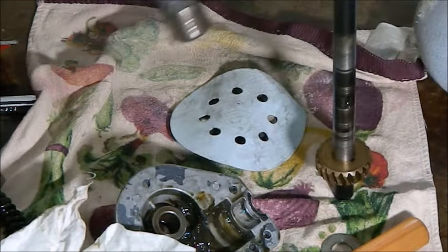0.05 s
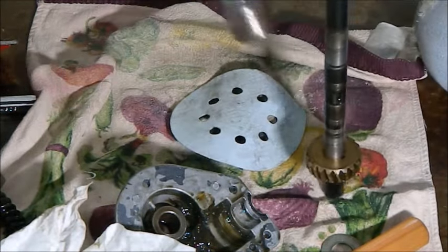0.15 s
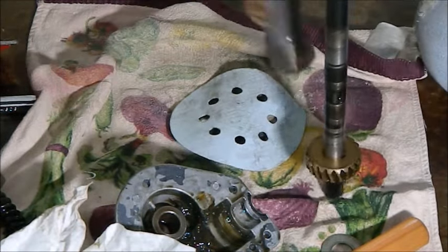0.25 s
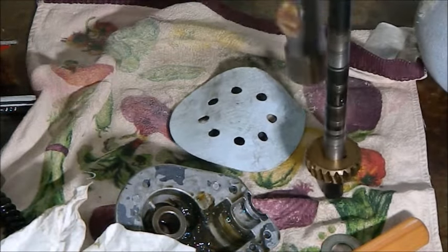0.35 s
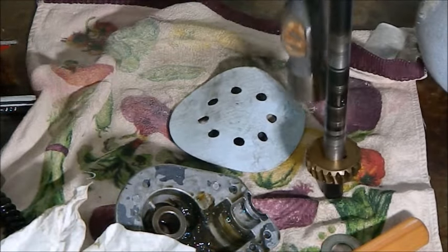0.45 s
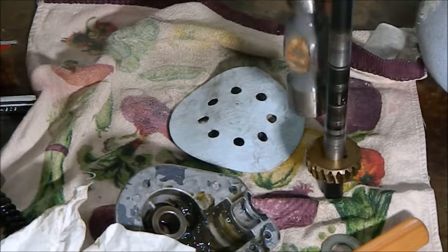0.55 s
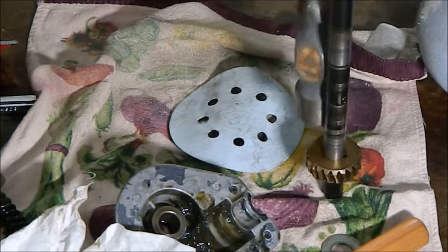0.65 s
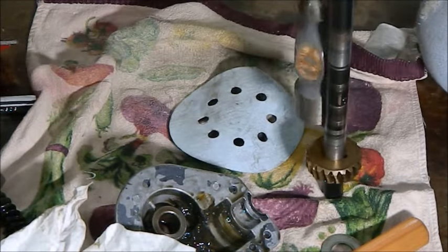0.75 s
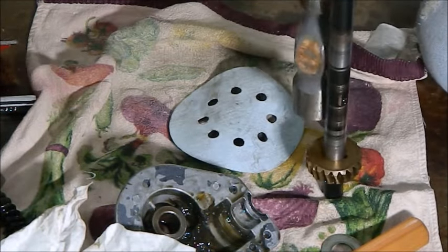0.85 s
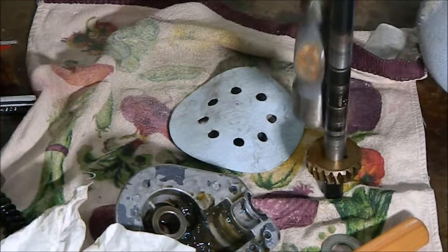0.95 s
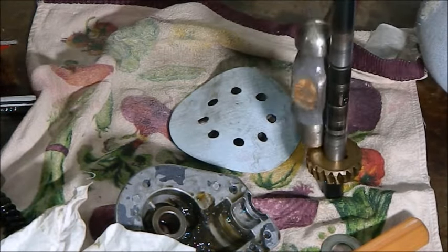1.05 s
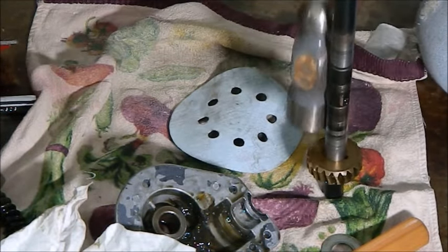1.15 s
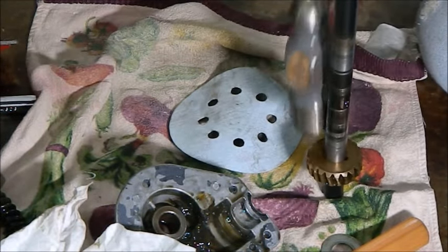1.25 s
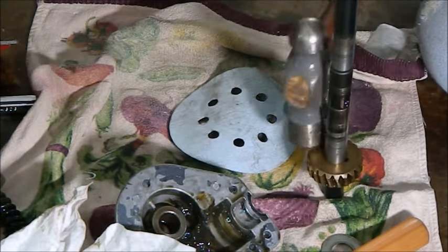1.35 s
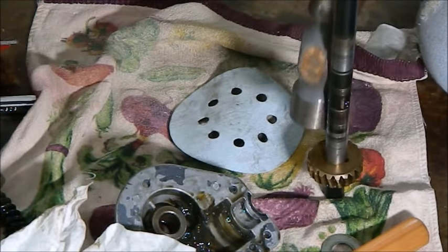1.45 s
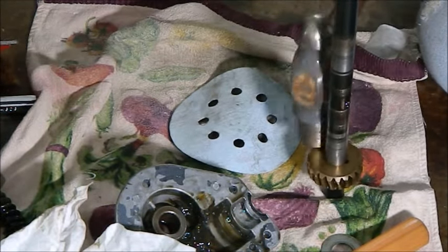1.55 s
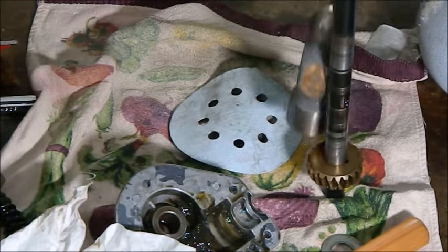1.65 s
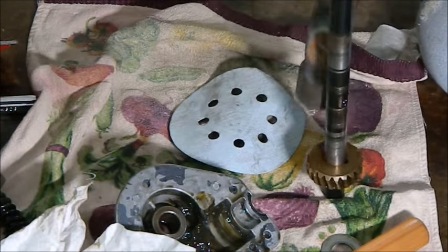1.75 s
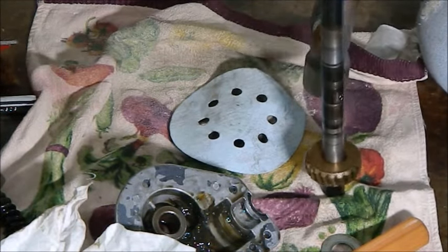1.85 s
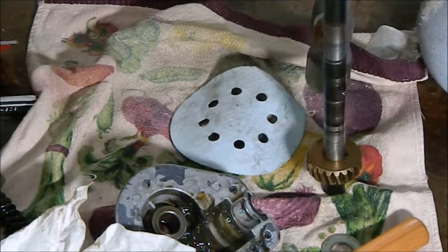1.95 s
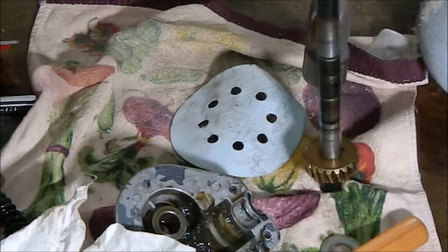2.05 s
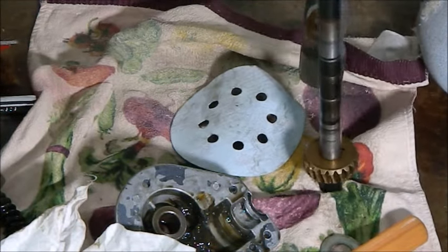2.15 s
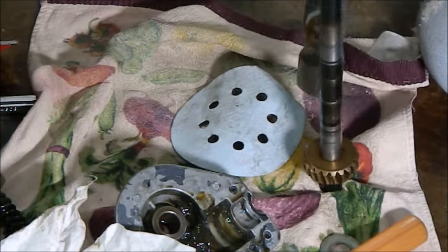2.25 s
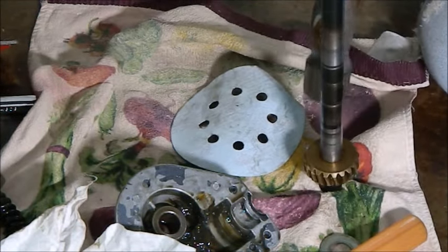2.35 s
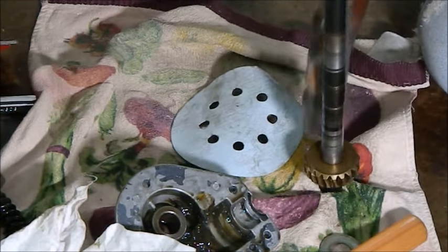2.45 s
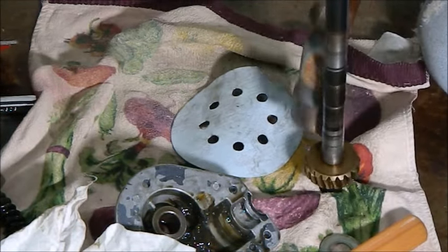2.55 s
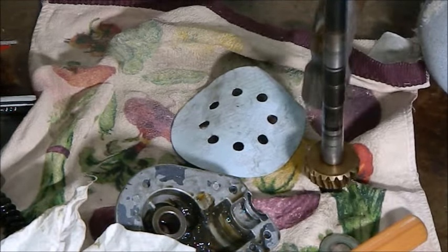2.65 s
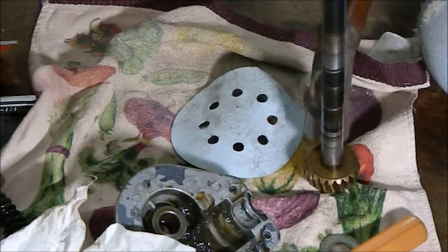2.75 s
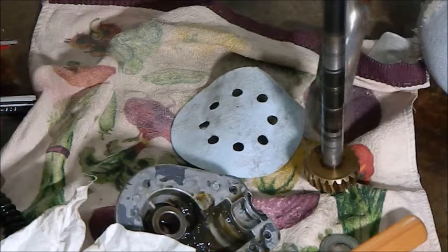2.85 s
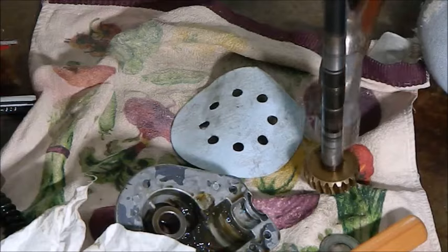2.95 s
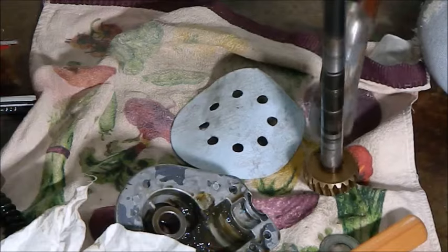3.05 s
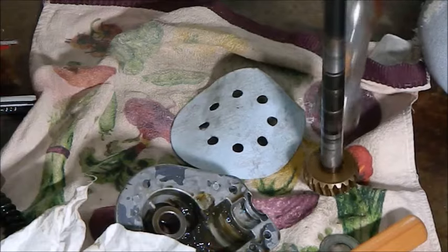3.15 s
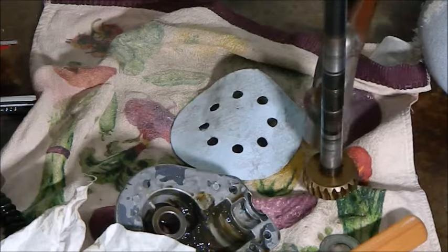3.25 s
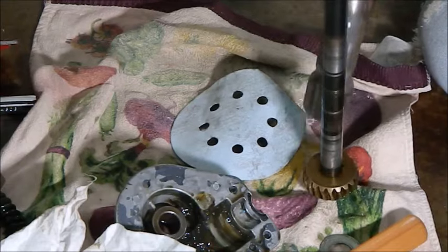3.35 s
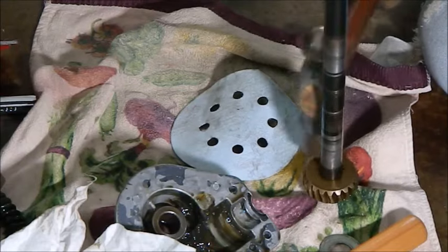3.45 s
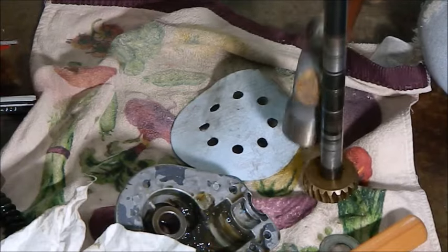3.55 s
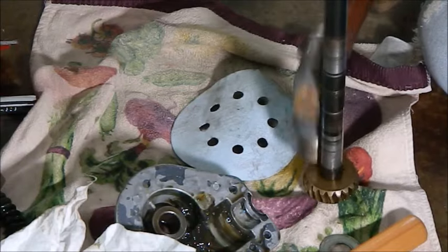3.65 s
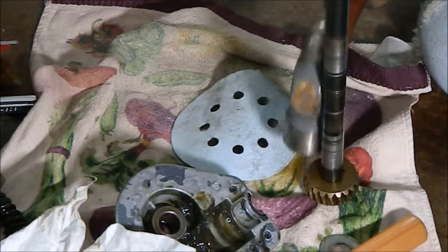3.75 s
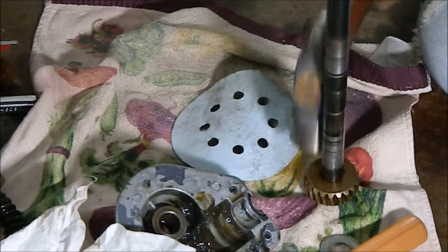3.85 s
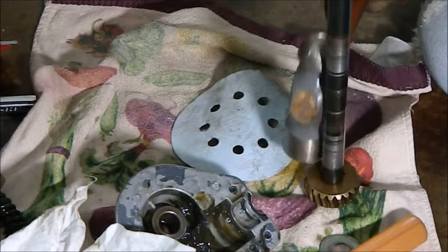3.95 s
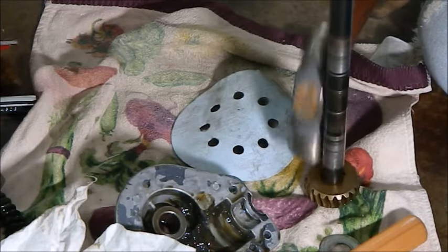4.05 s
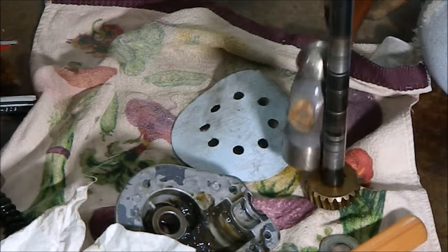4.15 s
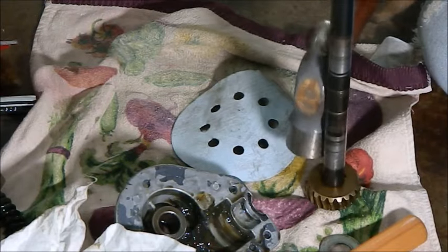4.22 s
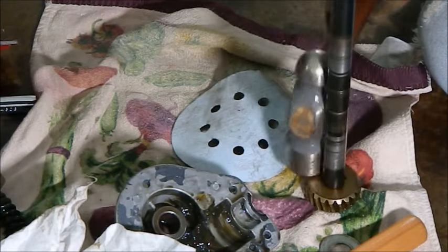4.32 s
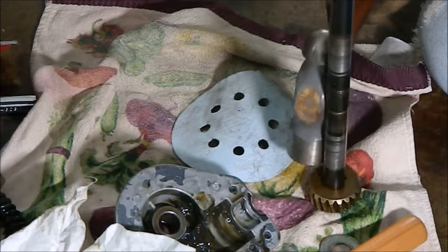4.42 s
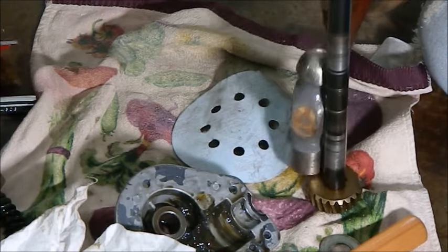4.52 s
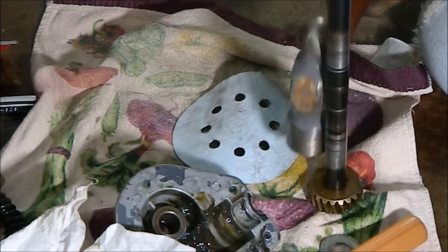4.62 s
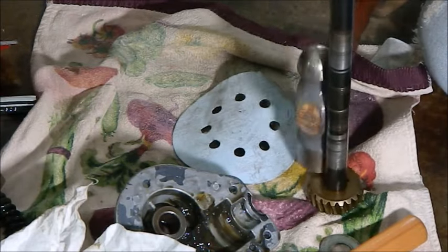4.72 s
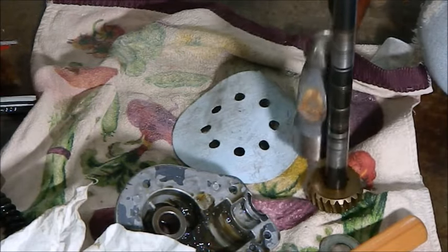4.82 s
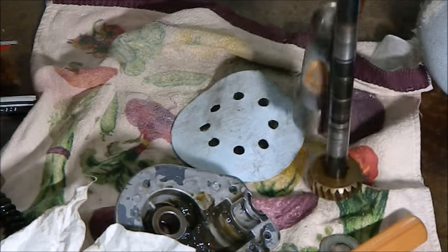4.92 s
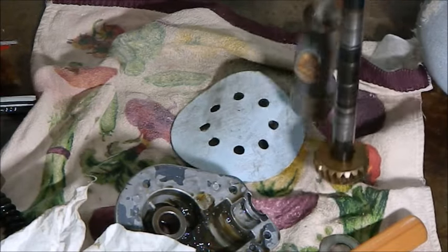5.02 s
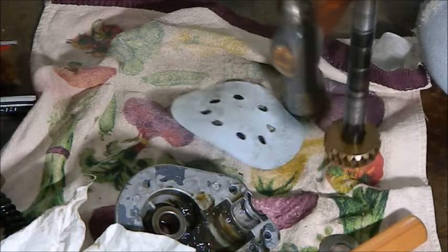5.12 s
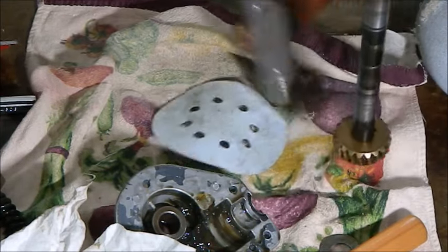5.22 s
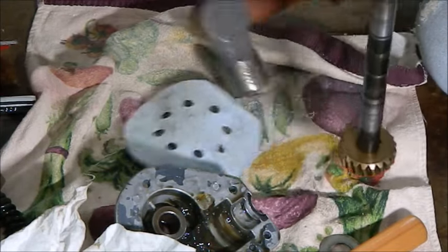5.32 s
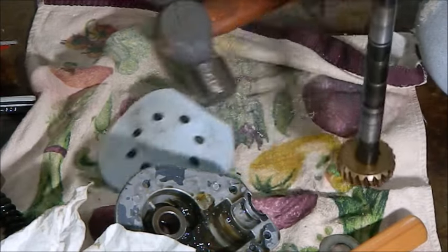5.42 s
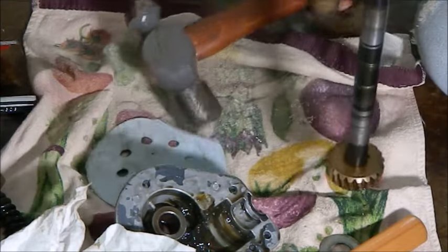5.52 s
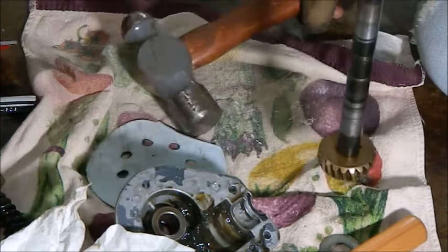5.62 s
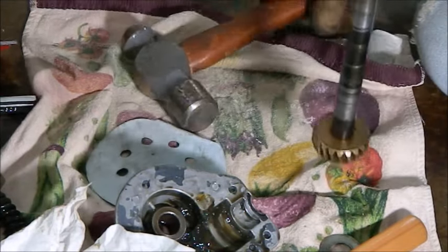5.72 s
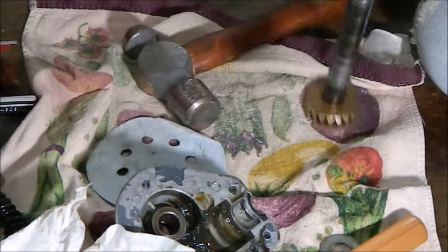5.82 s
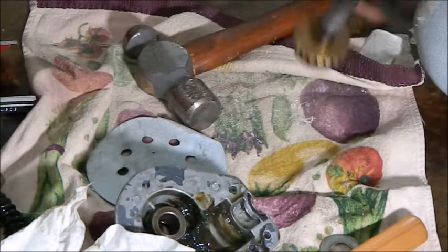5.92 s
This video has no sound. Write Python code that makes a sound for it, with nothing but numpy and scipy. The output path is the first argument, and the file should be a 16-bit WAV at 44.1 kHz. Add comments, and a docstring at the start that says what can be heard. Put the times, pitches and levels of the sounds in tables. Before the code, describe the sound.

Close stereo capture at a cloth-covered workbench indoors: bright, cracking hammer hits on a steel shaft, each with a short ring, gear rattle and woody low knock. Lighter ticks fall between them. The pitch sinks slightly as blows continue. The hammering stops, something brushes across cloth, two dull thuds follow, then one clear steel clank with a faint bounce.

```python
"""A small room with a cloth-covered workbench: a hammer drives a brass gear along a hand-held steel shaft.
Light taps tick and ring the shaft's modes; full blows add a noisy crack, gear rattle and low modes.
Then a cover slides over the cloth as shaped noise, and the work is set down with two padded thuds.
Loose steel clanks last. Dense reflections and a quiet wavering hush surround it all."""
import sys
import numpy as np
from scipy import signal
from scipy.fft import rfft, irfft
from scipy.io import wavfile

SR = 44100
rng = np.random.default_rng(int(sys.argv[2]) if len(sys.argv) > 2 else 0)


def store_wav(level_fs):
    """Save 16-bit WAV to argv[1]."""
    pcm = np.round(np.clip(np.atleast_2d(level_fs), -1, 1) * 32767)
    wavfile.write(sys.argv[1], SR, pcm.T.astype(np.int16))


N = 263629
SOUND_TIME_S = np.arange(int(SR * 0.8)) / SR  # shared by strikes and room tail


def undb(db):
    """Decibels to amplitude gain."""
    return 10 ** (np.asarray(db) / 20)


def along(points, hz):
    """Interpolate a spectrum table on a log-frequency axis."""
    point_hz, value = np.transpose(points)
    return np.interp(np.log(np.maximum(hz, 1)), np.log(point_hz), value)


def colour(x, points, power=1):
    """Filter causally with the table's spectrum: the folded cepstrum gives minimum phase."""
    size = 4096
    level_db = power * along(points, np.fft.rfftfreq(size, 1 / SR))
    cepstrum = irfft(np.log(undb(level_db)))
    cepstrum[1:size // 2] *= 2
    cepstrum[size // 2 + 1:] = 0
    impulse_response = irfft(np.exp(rfft(cepstrum)))
    return signal.fftconvolve(x, impulse_response)[:len(x)]


def unit(x):
    """Scale to an energy of one."""
    return x / np.sqrt(np.sum(x ** 2))


def fade(t60_s):
    """Exponential decay, 60 dB down after t60_s."""
    return np.exp(-np.log(1000) * SOUND_TIME_S / t60_s)


def add(track, start_s, sound):
    """Mix a sound into the track at start_s."""
    i = int(start_s * SR)
    track[..., i:i + sound.shape[-1]] += sound[..., :N - i]


def ring(modes, scatter_db, detune):
    """Sum decaying modes of alternating sign; each strike scatters their levels and pitches."""
    chance = rng.standard_normal((len(modes), 2))
    total = 0
    for k, ((pitch_hz, level_db, t60_s), (level_dev, pitch_dev)) in enumerate(zip(modes, chance)):
        gain = (-1) ** k * undb(level_db + scatter_db * level_dev)
        wave = np.sin(2 * np.pi * pitch_hz * (1 + detune * pitch_dev) * SOUND_TIME_S)
        total = total + gain * fade(t60_s) * wave
    return unit(total)


def contact(spectrum, t60_s, chatter):
    """One sharp impact, then the faces chatter unevenly as decaying noise."""
    grain, size = rng.standard_normal((2, len(SOUND_TIME_S)))
    force = chatter * unit(grain * undb(4 * size) * fade(t60_s))
    force[0] += 1
    return unit(colour(force, spectrum))


# width of diffuse sound: freq_hz, side_minus_mid_db [Hz, dB]
DIFFUSE_WIDTH = [(50, -6), (150, -7), (500, -9.5), (1200, -6.5), (3000, -4.5), (9000, 0.5)]


def spread(mid, side):
    """Left and right of a diffuse field: alike in the bass, apart in the treble."""
    side = colour(side, DIFFUSE_WIDTH)
    return np.array([mid + side, mid - side])


# room air spectrum: freq_hz, level_db_per_hz [Hz, dB per Hz]
HUSH_SPECTRUM = [(15, -87), (25, -39), (64, -5), (161, -5), (326, -16.5), (373, -1), (463, -7.5), (607, -5),
                 (714, -13), (1160, -15), (1480, -16), (2410, -17.5), (2840, -22.5), (16000, -32)]
HUSH_DB, HUSH_WAVER_DB = -59, 0.81


def hush():
    """Quiet room air: coloured stereo noise whose level wavers a little."""
    mid, side = (colour(rng.standard_normal(N), HUSH_SPECTRUM) for _ in range(2))
    air = spread(mid, side)
    waver = np.interp(np.arange(N), np.linspace(0, N, 40), rng.standard_normal(size=40))
    return air / np.std(air) * undb(HUSH_DB + HUSH_WAVER_DB * waver)


# room decay: freq_hz, t60_s [Hz, s]
ROOM_DECAY = [(100, 0.34), (400, 0.47), (2000, 0.37), (5000, 0.38), (8000, 0.31), (15000, 0.18)]
BUILD_UP_S = 0.0046


def reverberation():
    """Dense reflections build up fast and decay band by band, soonest in the top treble."""
    hz = np.fft.rfftfreq(len(SOUND_TIME_S), 1 / SR)
    noise = rfft(rng.standard_normal(len(SOUND_TIME_S)))
    tail = 0
    for centre_hz, t60_s in ROOM_DECAY:
        # triangular band on the log-frequency axis
        band = along([(f, float(f == centre_hz)) for f, _ in ROOM_DECAY], hz)
        tail = tail + irfft(noise * band, len(SOUND_TIME_S)) * fade(t60_s)
    return unit(tail * (1 - np.exp(-SOUND_TIME_S / BUILD_UP_S)))


def room(x, wet_db):
    """Direct sound plus the answer of the walls, by convolution."""
    response = undb(wet_db) * spread(reverberation(), reverberation())
    response[:, 0] += 1
    return signal.fftconvolve(np.atleast_2d(x), response, axes=1)[:, :N]


# rubs of hands, and the stronger sliding cover: peak_s, level_db, width_s [s, dB, s]
RUBS = [(0.126, -67, 0.04), (1.946, -67, 0.1), (2.352, -66.5, 0.027), (5.202, -48.5, 0.063),
        (5.374, -51, 0.058)]
# cloth friction spectrum: freq_hz, level_db_per_hz [Hz, dB per Hz]
CLOTH_SPECTRUM = [(200, -16), (700, -1), (1500, 3), (2600, 9), (4500, 1.5), (8000, -3), (14000, -9),
                  (16000, -23)]
RUB_RISE = 0.41  # share of the width before the peak


def sliding():
    """Hands and cover rub over the cloth: fibre noise swells and fades with the stroke's speed."""
    t = np.arange(N) / SR
    speed = 0
    for peak_s, level_db, width_s in RUBS:
        side_width_s = width_s * np.where(t < peak_s, RUB_RISE, 1 - RUB_RISE)
        speed = speed + undb(level_db) * np.exp(-((t - peak_s) / side_width_s) ** 2)
    fibres = rng.standard_normal(N) * undb(10 * rng.standard_normal(N))
    return speed * unit(colour(fibres, CLOTH_SPECTRUM)) * np.sqrt(N)


# soft landings on the cloth: start_s, level_db, knock_db [s, dB, wooden knock relative dB]
LANDINGS = [(5.619, -4, -19), (5.763, -3.5, -5.5)]
# loose steel knocking together: start_s, level_db [s, dB]
STEEL_CLANKS = [(5.9007, -5.5), (5.9708, -27)]
# contact spectra of body, padded wood and steel: freq_hz, level_db_per_hz [Hz, dB per Hz]
BODY_SPECTRUM = [(20, -50), (45, -45), (70, -39), (110, -32), (160, -5), (260, -14), (380, 3), (600, -3),
                 (950, -4), (1400, -6.5), (2200, -30.5), (4000, -68)]
WOOD_SPECTRUM = [(200, -12), (700, -12.5), (1300, 3), (2100, -1.5), (2600, -20), (4000, -33.5)]
CLINK_SPECTRUM = [(60, -18), (400, -7), (1000, -7.5), (1600, -5.5), (2300, 2.5), (3200, -2.5), (3700, 1.5),
                  (4500, -14), (5500, -10), (8000, -25), (16000, -36)]
# low modes of bench and room: pitch_hz, level_db, t60_s [Hz, dB, s]
LOW_MODES = [(80.5, -13.5, 0.19), (156.7, -5, 0.12), (227, -16.5, 0.21), (299, -15, 0.36),
             (367.4, -2, 0.27), (418.6, -1, 0.33), (485, 1, 0.099), (526.5, -3, 0.33), (550, -10, 0.52)]
# modes of loose steel: pitch_hz, level_db, t60_s [Hz, dB, s]
STEEL_MODES = [(2070, -2, .3), (2180, 0, .35), (2510, -3, .2), (2690, -5, .2), (2975, -5, .2),
               (3560, -3, .2), (3680, -1, .22), (5130, -5, .22), (5250, -8, .2), (6730, -12, .16),
               (8580, -22, .15), (11700, -27, .12)]
LANDING_BODY_DB, LANDING_CLOTH_DB = -2, -30  # relative to the ring of the low modes
CLINK_DB = 7.5  # relative to the steel ring


def setting_down():
    """Two padded landings excite the low modes; then bare steel meets steel and bounces."""
    noise, metal, low = np.zeros((3, N))
    for start_s, level_db, knock_db in LANDINGS:
        body = contact(BODY_SPECTRUM, t60_s=0.022, chatter=0.44)
        knock = contact(WOOD_SPECTRUM, t60_s=0.033, chatter=0.6)
        cloth = contact(CLOTH_SPECTRUM, t60_s=0.055, chatter=2.9)
        add(noise, start_s, undb(level_db + LANDING_BODY_DB) * body)
        add(noise, start_s, undb(level_db + knock_db) * knock)
        add(noise, start_s, undb(level_db + LANDING_CLOTH_DB) * cloth)
        add(low, start_s, undb(level_db) * ring(LOW_MODES, scatter_db=3, detune=0.017))
    for start_s, level_db in STEEL_CLANKS:
        clink = contact(CLINK_SPECTRUM, t60_s=0.014, chatter=1)
        add(noise, start_s, undb(level_db + CLINK_DB) * clink)
        add(metal, start_s, undb(level_db) * ring(STEEL_MODES, scatter_db=1, detune=0.002))
    return noise, metal, low


# gear and shaft modes that keep their pitch: pitch_hz, level_db, t60_s [Hz, dB, s]
HIGH_RING_MODES = [(7378, -6, .12), (7416, -1, .2), (7450, -9, .08), (8535, -12, .1), (8615, -9, .16),
                   (10650, -21, .08), (11000, -16, .12), (13150, -23, .08), (14950, -26, .07)]


def high_ring():
    """The thin, bright ring on top of a strike: high modes barely detuned."""
    return ring(HIGH_RING_MODES, scatter_db=2, detune=0.0008)


# overtones as the gear moves: time_s, second_mode_db, high_ring_db [s, dB, dB]
OVERTONE_LEVELS = [(1.5, -12.5, -15), (2.55, 6, -7), (3.03, 0.5, -12), (3.3, -2.5, 0.5), (4.2, 6, -4),
                   (4.8, -10.5, -9)]


def overtones(time_s):
    """Levels in dB of the second bending mode and the high ring, which change as the gear moves."""
    times_s, *levels_db = np.transpose(OVERTONE_LEVELS)
    return [np.interp(time_s, times_s, db) for db in levels_db]


# shaft bending modes at the reference note: pitch_hz, level_db, drift_share [Hz, dB, share of note drift]
SHAFT_MODES = [(1867, -3, 0.94), (1922.4, 0, 0.96), (1962, 0, 0.934), (2080, -24, 1), (2320, -19.5, 0.63),
               (3184, -6.5, 0.24), (3322, -4, 0.66), (3386, -4.5, 0.66), (4800, -16, .3),
               (4610, -8.5, 0.24), (4876, -8.5, 0.317), (6580, -10.5, 0.18), (6700, -14, 0.53)]
# decay of each part of the ring: clack_t60_s, linger_t60_s [s, s]
SHAFT_DECAYS_S = (.03, .15)
REFERENCE_NOTE_HZ, FIRST_NOTE_HZ, SAG_HZ_PER_BLOW = 1950, 2069, 15.98


def shaft(start_s, hardness_db, linger_db):
    """Bending modes sink as blows drive the gear; it swallows most ring at once, a share lingers."""
    blows_so_far = sum(blow[0] < start_s for blow in FULL_BLOWS)
    note_hz = FIRST_NOTE_HZ - SAG_HZ_PER_BLOW * blows_so_far
    drift = note_hz / REFERENCE_NOTE_HZ - 1
    second_db, _ = overtones(start_s)
    # a soft contact lasts longer and mutes the high modes: (Hz, share of the hardness)
    reach = [(2300, 0.053), (3300, 0.55), (4700, 0.95), (7400, 0.97)]
    levelled = []
    for pitch_hz, level_db, drift_share in SHAFT_MODES:
        is_second = 2800 < pitch_hz < 3800
        mode_db = level_db + hardness_db * along(reach, pitch_hz) + second_db * is_second
        levelled.append((pitch_hz * (1 + drift_share * drift), mode_db))
    parts = []
    for t60_s in SHAFT_DECAYS_S:
        modes = [(pitch_hz, mode_db, t60_s) for pitch_hz, mode_db in levelled]
        parts.append(ring(modes, scatter_db=2, detune=0.003))
    clack, linger = parts
    return unit(clack + undb(linger_db) * linger)


# light taps and rebounds: start_s, level_db, hardness_db [s, dB, dB on the overtones]
LIGHT_TAPS = [(0.7373, -9, -29), (.9108, -23.5, -36), (1.1483, -10, -9), (1.492, -1, -8), (1.7, -9.5, -33),
              (2.467, -8.5, -28), (2.5326, -6.5, -15), (2.7418, -10, -21), (3.694, -9.5, -7),
              (3.8863, -6, 1), (4.0925, -11, -1.5), (4.4164, -8.5, -5), (4.506, -12, -6), (4.725, -6, -2)]
# tap contact spectrum: freq_hz, level_db_per_hz [Hz, dB per Hz]
TICK_SPECTRUM = [(100, -39), (500, -2), (950, 8), (1400, -8.5), (2100, 2.5), (3200, 8.5), (4300, -9),
                 (6500, -20), (9000, -52), (16000, -41)]
TAP_TICK_DB, TAP_HIGH_DB = -6.5, -14  # relative to the shaft ring; hardness shifts the high ring


def taps():
    """Light taps tick and ring the shaft without exciting the low modes."""
    noise, metal, low = np.zeros((3, N))
    for start_s, level_db, hardness_db in LIGHT_TAPS:
        tick = contact(TICK_SPECTRUM, t60_s=0.025, chatter=1)
        high_db = level_db + hardness_db / 2 + TAP_HIGH_DB
        add(noise, start_s, undb(level_db + TAP_TICK_DB) * tick)
        add(metal, start_s, undb(level_db) * shaft(start_s, hardness_db, linger_db=-6.5))
        add(metal, start_s, undb(high_db) * high_ring())
    return noise, metal, low


# full blows: start_s, strength_db, thud_db, knock_db [s, dB, low modes relative dB, middle relative dB]
FULL_BLOWS = [(1.083, -4.5, 8, -10.5), (1.363, -2.5, -7.5, 4), (1.601, -1.5, -3.5, 2.5),
              (2.552, -3, 0.5, -5.5), (2.8092, -1.5, -3.5, -6.5), (3.033, -1.5, -1, -8.5),
              (3.2704, 1, -3.5, -4), (3.521, -3.5, -3, -3), (3.7465, -2.5, 3, -7.5), (3.9632, -3, -6.5, -6),
              (4.159, 0.5, -5.5, -6.5), (4.35, -0.5, -2, -6), (4.546, -3, 3.5, 4), (4.7903, -3.5, 1.5, 1.5)]
# spectra of hammer crack and gear rattling on the shaft: freq_hz, level_db_per_hz [Hz, dB per Hz]
CRACK_SPECTRUM = [(100, -22), (400, -17.5), (1000, -3), (1500, -10), (2000, 5.5), (2700, -2.5), (4000, -3),
                  (5000, -1.5), (6800, 0.5), (8000, -16), (10000, -16.5), (13000, -23.5), (16000, -26)]
RATTLE_SPECTRUM = [(500, -15), (2000, -28), (5000, -10), (7400, 2.5), (8600, -1), (9600, -7.5), (11000, -5),
                   (12500, -15), (16000, -22)]
# middle bench modes reached by square blows: pitch_hz, level_db, t60_s [Hz, dB, s]
KNOCK_MODES = [(596, -5, 0.52), (668, -2.5, 0.25), (714, 3.5, 0.12), (773, -6, 0.23), (827, 10.5, 0.03),
               (898, 4, 0.17), (1016, -7.5, 0.37), (1072, -2.5, 0.09)]
# parts at strength 0 dB, before overtone, thud and knock levels
CRACK_DB, SHAFT_DB, RATTLE_DB, HIGH_RING_DB, BODY_DB = 1, -2, -7.5, -5.5, 1
RATTLE_DB_PER_STRENGTH_DB = 2.37  # hard blows shake the gear loose
RATTLE_LAG_S, KNOCK_LAG_S, THUD_LAG_S = 0.0012, 0.00078, 0.00218  # after contact
BLOW_PAN_DB = 1  # left minus right


def blows():
    """Full blows crack, ring the shaft, jolt the gear into rattling and excite low and middle modes."""
    noise, metal, low = np.zeros((2, N)), np.zeros((2, N)), np.zeros(N)
    pan = undb(BLOW_PAN_DB * np.array([[1], [-1]]) / 2)
    for start_s, strength_db, thud_db, knock_db in FULL_BLOWS:
        _, high_db = overtones(start_s)

        crack = contact(CRACK_SPECTRUM, t60_s=0.012, chatter=3.7)
        rattle = contact(RATTLE_SPECTRUM, t60_s=0.1, chatter=4.9)
        body = contact(BODY_SPECTRUM, t60_s=0.034, chatter=1.45)
        rattle_db = RATTLE_DB_PER_STRENGTH_DB * strength_db + RATTLE_DB
        body_db = strength_db + (thud_db + knock_db) / 2 + BODY_DB
        add(noise, start_s, pan * undb(strength_db + CRACK_DB) * crack)
        add(noise, start_s + RATTLE_LAG_S, pan * undb(rattle_db) * rattle)
        add(noise, start_s, undb(body_db) * body)

        shaft_ring = shaft(start_s, hardness_db=-5, linger_db=-6.5)
        add(metal, start_s, pan * undb(strength_db + SHAFT_DB) * shaft_ring)
        add(metal, start_s, pan * undb(strength_db + high_db + HIGH_RING_DB) * high_ring())

        thud = ring(LOW_MODES, scatter_db=3, detune=0.0076)
        knock = ring(KNOCK_MODES, scatter_db=2.5, detune=0.0102)
        add(low, start_s + THUD_LAG_S, undb(strength_db + thud_db) * thud)
        add(low, start_s + KNOCK_LAG_S, undb(strength_db + knock_db) * knock)
    return noise, metal, low


# stereo lean, the shaft being to the right: freq_hz, left_minus_right_db [Hz, dB]
WORK_LEAN = [(50, -1.5), (150, 3), (500, 2), (1100, 0.5), (2200, -4), (5000, -8.5), (9000, -1),
             (13000, 5.5)]
WORK_WET_DB, LOW_WET_DB = -1.5, -12  # reverberation relative to direct sound


def scene():
    """Contact noise, metal and low modes sound into the room, balanced left to right by frequency."""
    sources = zip(setting_down(), taps(), blows())
    noise, metal, low = (landing + tap + blow for landing, tap, blow in sources)
    work = room(noise + sliding(), WORK_WET_DB)
    work = work + room(metal, WORK_WET_DB) + room(low, LOW_WET_DB)
    left = colour(work[0], WORK_LEAN, power=1 / 2)
    right = colour(work[1], WORK_LEAN, power=-1 / 2)
    return hush() + np.array([left, right])


BASS_CUT_HZ, TOP_HZ = 45, 16000
CEILING = 0.5  # full scale = 1


def record(dry):
    """Small microphones lose the deepest bass; the recorder rounds sharp peaks and cuts the top."""
    bass_cut = signal.butter(2, BASS_CUT_HZ, "high", fs=SR, output="sos")
    top_cut = signal.ellip(8, 0.2, 70, TOP_HZ, fs=SR, output="sos")
    thin = signal.sosfilt(bass_cut, dry)
    rounded = CEILING * np.tanh(thin / CEILING)
    return signal.sosfilt(top_cut, rounded)


dry = scene()
out = record(dry)
store_wav(out)
```